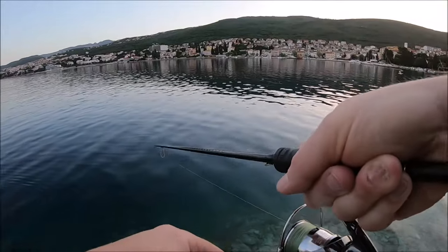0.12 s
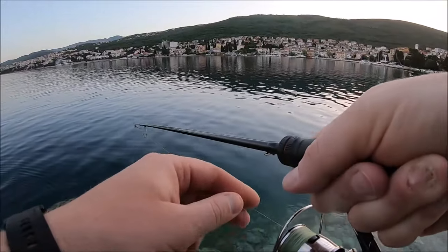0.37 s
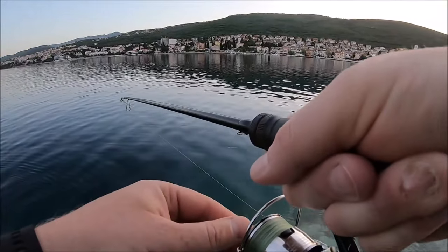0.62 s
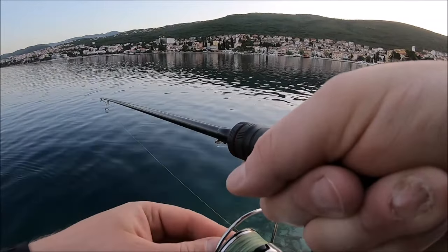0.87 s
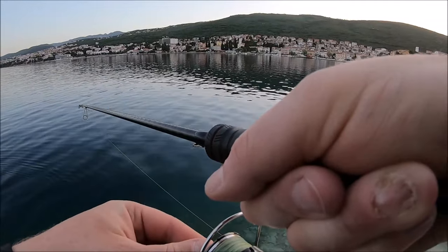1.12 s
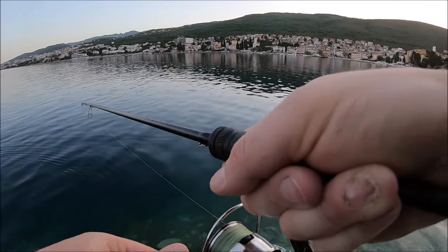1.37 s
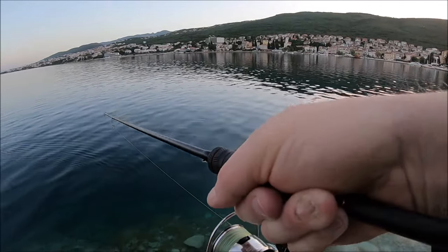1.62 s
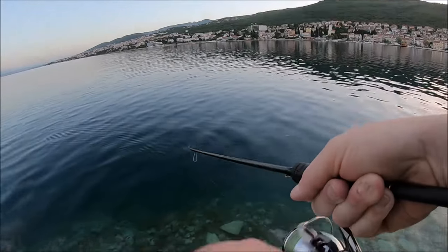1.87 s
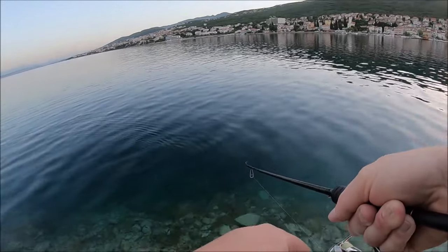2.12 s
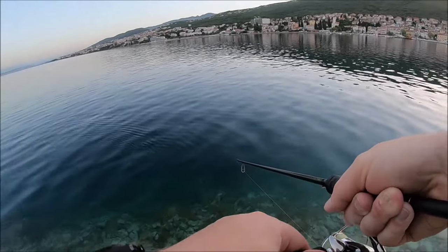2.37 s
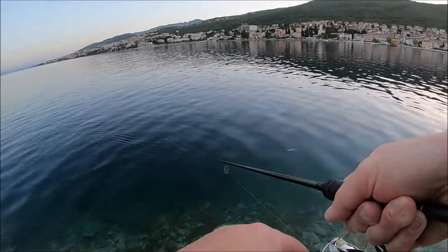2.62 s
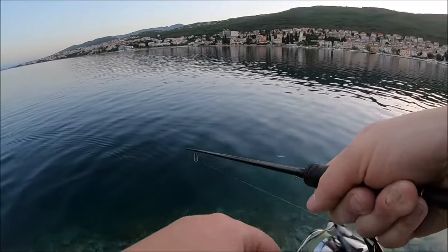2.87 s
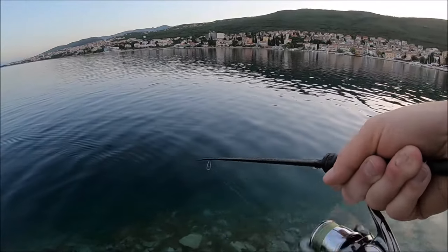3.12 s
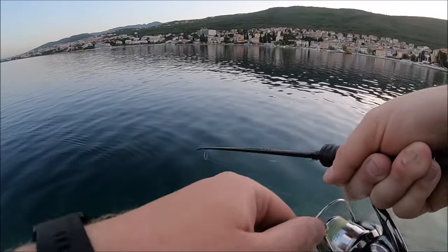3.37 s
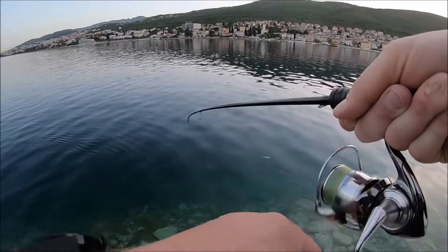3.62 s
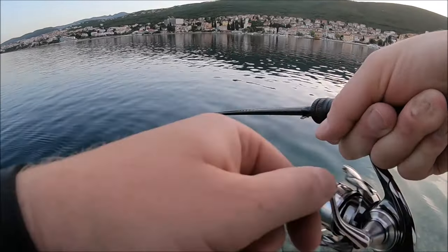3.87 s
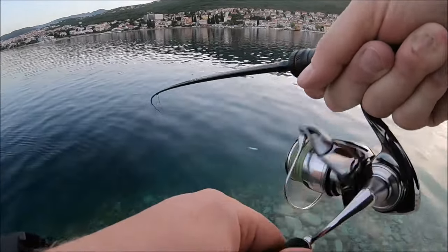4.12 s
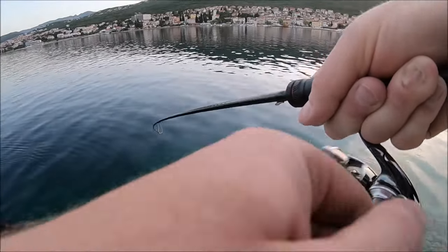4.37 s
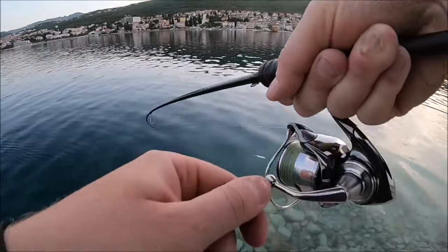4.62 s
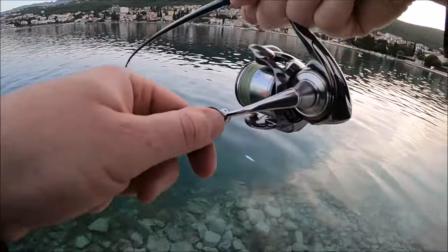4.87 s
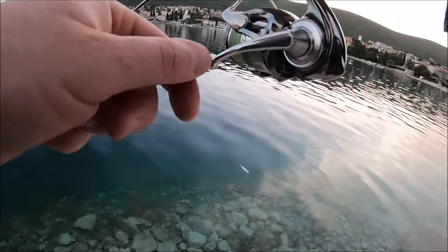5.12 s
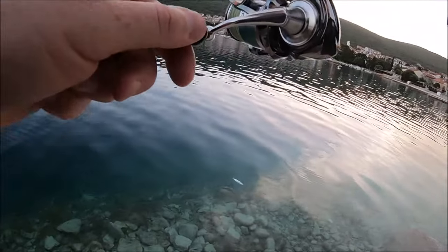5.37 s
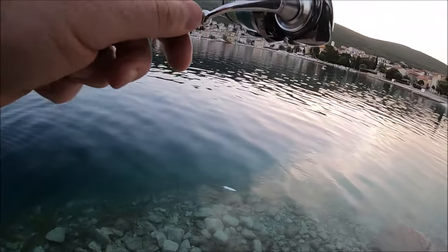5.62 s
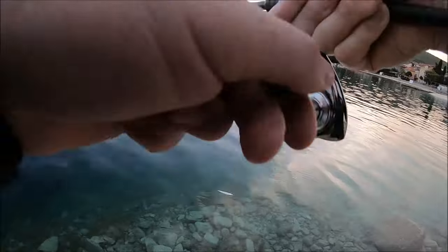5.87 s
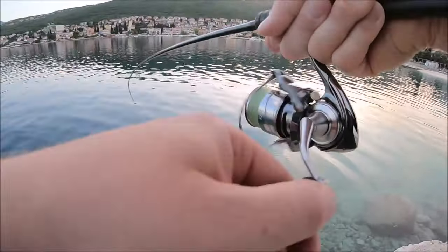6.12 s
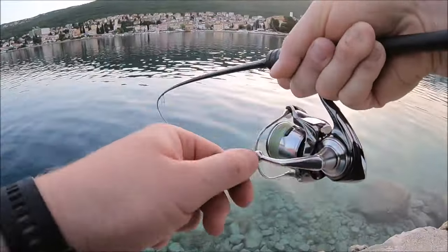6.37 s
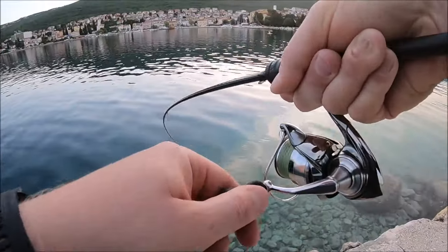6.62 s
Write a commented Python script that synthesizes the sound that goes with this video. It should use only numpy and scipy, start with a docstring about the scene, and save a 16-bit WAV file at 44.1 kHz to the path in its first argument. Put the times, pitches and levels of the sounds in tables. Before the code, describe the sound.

A fishing reel is worked in uneven bursts at a calm shore: thin grainy gear whir, bright dry metallic clicks, and two rapid ratchet buzzes as line slips out. Hands rustle softly between spurts. The longest cranking comes mid-way with steady clicking; the fastest comes late, with heavy thuds against the microphone mount. Everything is close and dry, with light low wind and barely audible distant water behind.

```python
"""A spinning reel is cranked in spurts at a calm shore, close under a chest-worn camera with two sound ports.
A short crank whine with four clicks opens it; after a lull of small ticks, a crank at 1.7 s ends in a buzz
as line runs out and snaps of the drag spring crowd together. From 2.9 s a long spurt whines with crank speed
among spool clicks, which go on to 5 s. From 5.7 s a fast crank comes with the rod butt bumping the chest, then a
last buzz. Filtered noise runs throughout: a hiss and rustle of rubbing, light wind in the ports, far water."""
import sys
import numpy as np
from scipy import signal
from scipy.io import wavfile
from scipy.ndimage import uniform_filter1d

SR = 44100
rng = np.random.default_rng(int(sys.argv[2]) if len(sys.argv) > 2 else 0)


def volts_from_decibels(level):
    """Turn decibel levels (scalar or array-like) into linear amplitude factors."""
    exponent = np.asarray(level, float) / 20
    return 10 ** exponent


def output_pcm(signal):
    """Save a mono or channel-first signal as 16-bit PCM at the path in sys.argv[1].

    Samples are clipped to [-1, 1] before scaling.
    """
    pcm = np.clip(np.atleast_2d(signal).T, -1, 1) * 32767
    wavfile.write(sys.argv[1], SR, np.round(pcm).astype(np.int16))


N = 297234
T = np.arange(N) / SR  # time of every sample in seconds


# Single snaps of the drag spring. Each row: time in seconds, strength in dB before the spool colours it.
SINGLE_SNAPS = [(0.031, -20.5), (0.0592, -21.5), (0.0864, -18.5), (0.1333, -22), (1.9308, -27),
                (1.9592, -28), (1.976, -24.5), (2.011, -34.5), (2.0245, -23), (2.0352, -23.5),
                (2.5657, -36.5), (2.582, -24.5), (2.5885, -33.5), (2.598, -22.5), (2.6198, -24.5),
                (2.6293, -31), (2.6435, -28), (2.6589, -27.5), (2.6902, -28.5), (2.9384, -25.5),
                (3.1114, -25.5), (3.2312, -25), (3.2737, -23.5), (3.301, -29.5), (3.3235, -28),
                (3.3488, -21.5), (3.3911, -22), (3.4224, -19.5), (3.454, -20.5), (3.4988, -20.5),
                (3.5538, -21.5), (3.5901, -21.5), (3.6455, -22.5), (3.7445, -25), (3.836, -28.5),
                (3.877, -29.5), (3.9334, -23.5), (3.9664, -19.5), (4.0099, -23), (4.048, -24),
                (4.0753, -22), (4.101, -24.5), (4.1307, -23), (4.1524, -27.5), (4.171, -20.5),
                (4.1966, -23), (4.2218, -28), (4.2405, -27.5), (4.2639, -24.5), (4.2853, -26),
                (4.3106, -26), (4.3443, -26), (4.3696, -29), (4.3964, -25), (4.4253, -24), (4.444, -23),
                (4.46, -24.5), (4.482, -24), (4.5099, -21), (4.528, -24), (4.5432, -22.5), (4.558, -24.5),
                (4.5741, -23), (4.588, -21.5), (4.6025, -23), (4.6176, -24), (4.6383, -21.5), (4.659, -22),
                (4.6946, -19.5), (4.706, -36.5), (4.727, -21), (4.7631, -21.5), (4.804, -22),
                (4.8407, -21.5), (4.8676, -22), (4.8865, -35.5), (4.8997, -21), (4.9372, -19),
                (4.975, -22.5), (5.6656, -26.5), (6.2372, -32.5), (6.2954, -27), (6.3138, -29.5),
                (6.3311, -31), (6.3562, -30.5), (6.3768, -28.5), (6.3932, -23), (6.4079, -25.5),
                (6.4242, -26.5), (6.4426, -27), (6.4643, -28.5), (6.519, -27), (6.5345, -30.5),
                (6.545, -22), (6.5581, -28.5), (6.573, -23.5), (6.5915, -27)]
# Fast runs of snaps while line pays out, one list a run.
# Each row: time in seconds, average snaps per second, strength in dB before the spool colours it.
LINE_RUNS = [
    [(2.042, 185, -24), (2.1, 150, -29.5), (2.15, 235, -28.5), (2.29, 195, -26), (2.35, 142, -25.5),
     (2.44, 230, -26), (2.51, 270, -29), (2.56, 120, -22)],
    [(6.6, 180, -23), (6.63, 225, -25.5), (6.71, 270, -24.5), (6.74, 350, -31)],
]
# Ringing modes of spool and spring. Each row: pitch in Hz, relative level in dB,
# time to die by 60 dB in seconds, left over right in dB, how far the left leads in radians.
SPOOL_MODES = [(3840, -21.5, 0.021, -6.5, 1), (4510, -23.5, 0.032, -5, -2.5), (5050, -11, 0.025, 2, -2),
               (5846, -12.5, 0.012, -16.5, -1), (6220, -29.5, 0.15, 14, -6.5), (6990, 4.5, 0.0067, -5, 1),
               (7404, -5, 0.016, -0.5, 2.74), (8070, -10.5, 0.022, -2, 0.78), (8720, -6.5, 0.018, 2, -9),
               (9370, -14, 0.02, 12, -7), (10040, -12.5, 0.013, -8.5, -2.5), (10760, -7.5, 0.0097, -3, -6),
               (11380, -13, 0.019, 3, 2.5), (12430, -18, .011, -1.5, 1.5), (13660, -12.5, 0.011, -1.5, 2),
               (14800, -22.5, 0.011, -5, -0.5)]
# Each spool mode beams its own way. Each entry: dB that mode gains with the reel fully side-on.
SIDE_ON_GAIN = [-6, -30, -9.5, -6.5, -3, 0, 3, 3.5, 8.5, -13, -4.5, -25.5, -7, -1.5, -10, 13]
# How the reel is held. Each row: time in seconds, how far side-on from 0 to 1, extra left over right in dB
# near 7 kHz, dB added to modes over 9.5 kHz as the spool tips to the ports.
REEL_FACING = [(0, 0.13, 8, 1.5), (1.9, 0.3, 3.5, 4.5), (2.7, 0.66, 5, 1), (3.2, 0.28, -1, 5),
               (3.7, 0.15, -10, -0.5), (4.3, 0.08, 6, 4.5), (5, 0, -5.5, 3), (5.7, 0.34, -6, 2.5),
               (6.3, 0, 5, 9), (6.74, 0, -4.5, 6)]


def drag():
    """Each snap chatters for a few ms and rings the spool; every mode is struck a little differently."""
    snaps = np.zeros(N)
    for s, db in SINGLE_SNAPS:
        snaps[round(s * SR)] = volts_from_decibels(db)

    rate, level = np.zeros((2, N))
    for rows in LINE_RUNS:
        on = (T >= rows[0][0]) & (T < rows[-1][0])
        per_s, db = curves(rows)
        rate += on * per_s
        level += on * volts_from_decibels(db)
    uneven_rate = rate * (1 + 0.18 * slow(60).real)
    teeth = np.floor(np.cumsum(uneven_rate) / SR)  # a snap falls at each whole number
    run_level = level * volts_from_decibels(0.74 * rng.standard_normal(N))
    snaps[1:] += (np.diff(teeth) > 0) * run_level[1:]

    u = np.arange(700) / SR
    main_push = (u / 0.0014) ** 2 * np.exp(2 - 2 * u / 0.0014)
    chatter = main_push + 0.079 * (u > 0.002) * np.exp(-u / 0.0041)
    force = signal.oaconvolve(snaps, chatter)[:N]
    tooth = np.cumsum(snaps > 0)

    side_on, main_pan_db, bright_db = curves(REEL_FACING)
    high_pan_db = 3.5 - 4.0 * side_on  # upper modes lean left until the reel turns side-on
    out = np.zeros((2, N))
    for (hz, db, t60, pan_db, lead), side_db in zip(SPOOL_MODES, SIDE_ON_GAIN):
        long_ring = t60 > 0.05
        direct_noise, scattered_noise = rng.standard_normal((2, N))
        phase, grip, off = rng.standard_normal((999, 3))[tooth].T  # one draw a tooth
        pitch = hz * (1 + 0.03 * off)
        push = 0.19 * volts_from_decibels(0.5 * grip) * np.exp(2j * np.pi * (pitch * T + phase))
        # teeth grip unevenly; only some set off the long rings
        luck = volts_from_decibels(-9 * abs(off) * long_ring + 2 * grip)
        direct = ring(force * (push + direct_noise) * luck, hz, t60)
        scattered = ring(force * scattered_noise * luck, hz, t60)  # reaches the left port off the hand
        if hz > 7500:
            pan_db = pan_db + high_pan_db
        else:
            pan_db = pan_db + main_pan_db * (hz > 6500)
        both = pair(direct, pan_db, lead)
        both[0] = 0.71 * both[0] + 1.33 * volts_from_decibels(pan_db / 2) * scattered.imag
        both *= volts_from_decibels(3 * slow(15).real)  # the turning spool sweeps each mode past the ports
        mode_db = db + (hz > 9500) * bright_db + long_ring * 3.5 + side_on * side_db
        out += volts_from_decibels(mode_db) * both
    # so small a spool radiates little under its lowest modes
    band = signal.butter(3, [2900, 15900], "bandpass", fs=SR, output="sos")
    return volts_from_decibels(-26.5) * signal.sosfilt(band, out)


# Spurts of cranking, one list a spurt. Each row: time in seconds, gear tooth rate in Hz, load in dB.
CRANK_SPURTS = [
    [(0, 2146, 2), (.03, 2513, 0), (.09, 1376, 1.5), (.15, 1194, -6.5)],
    [(1.71, 1386, -9.5), (1.8, 3160, 2), (1.86, 3590, -0.5), (1.88, 3926, 0), (1.92, 2213, 0.5),
     (2.0, 1720, -5), (2.08, 1395, -18), (2.14, 2284, 4), (2.2, 2020, -3)],
    [(2.87, 1410, -21), (2.9, 1910, -0.5), (2.95, 1920, 0), (2.995, 2200, -1), (3.05, 1427, -5),
     (3.09, 1628, -1.5), (3.15, 2600, -4), (3.21, 2567, 1.5), (3.27, 1503, -6.5), (3.32, 1996, 3),
     (3.36, 1550, -7.5), (3.4, 1886, 0.5), (3.48, 1730, -3), (3.54, 1174, -2), (3.61, 1259, 2),
     (3.64, 1900, -1), (3.68, 2392, 3.5), (3.81, 1904, 1.5), (3.86, 2580, 6), (3.9, 1722, 3.5),
     (3.97, 1690, 3.5), (4.0, 1189, 2.5), (4.15, 970, -3.5), (4.25, 1535, 7.5), (4.31, 1414, 1.5),
     (4.35, 2123, 5), (4.43, 1997, 4.5), (4.48, 1313, 0.5), (4.6, 947, -5.5)],
    [(5.71, 1152, -8.5), (5.78, 2500, 9.5), (5.83, 3310, 2), (5.86, 3143, 5), (5.89, 3820, 4.5),
     (5.94, 4330, 9), (5.97, 3584, 0), (5.995, 4790, 13.5), (6.03, 2517, 4.5), (6.06, 1960, 4.5),
     (6.1, 2560, 4.5), (6.13, 2650, 6), (6.16, 3200, 3.5), (6.22, 3376, 1.5), (6.26, 2610, 7),
     (6.29, 3083, 5.5), (6.34, 1950, -0.5), (6.4, 1885, -11)],
]
# Tooth tone, octave and twelfth. Each row: dB at a 2 kHz tooth rate before the case colours it,
# dB gained per octave of speed, share of the load felt.
TOOTH_PARTIALS = [(-52., -0.4, 1.04), (-53.5, 4.5, 1.67), (-55, 1, 0.68)]


def gears():
    """A fuzzy, broken tooth tone with overtones follows crank speed and swells where it crosses a case resonance."""
    out = np.zeros((2, N))
    fuzz = []
    for width in (110, 200, 320):  # Hz, one for each partial
        blur = evened(slow(width) + 0.8 * slow(4 * width))
        fuzz.append(blur * volts_from_decibels(6 * slow(25).real - 3))
    waver = 1 + 0.022 * slow(45).real
    for on, hz, load_db in spurts(CRANK_SPURTS, 0.012):
        turn = np.exp(2j * np.pi * np.cumsum(hz * waver) / SR)
        for k, (db, slope_db, share) in enumerate(TOOTH_PARTIALS):
            f = hz * (k + 1)
            case = housing(f) / (1 + (f / 6500) ** 4)  # grease damps the highest overtones
            gain = on * volts_from_decibels(db + slope_db * np.log2(hz / 2000) + share * load_db) * case
            out += gain * pair(fuzz[k] * turn ** (k + 1), read(LEAN, f) - 2.5, read(LEAD, f))
    return out


# Resonances of the gear case. Each row: centre in Hz, width in Hz, gain at the centre in dB.
CASE_RESONANCES = [(1950, 200, 6.5), (2500, 200, 1), (2990, 450, -8.5), (3533, 200, 7.5), (3850, 650, 8),
                   (4650, 170, 3), (5350, 450, 7)]


def housing(hz):
    """Gain of the gear case: each resonance lifts or dips the sound around its centre."""
    gain = 1
    for f, width, db in CASE_RESONANCES:
        gain = gain + (volts_from_decibels(db) - 1) / (1 + (2 * (hz - f) / width) ** 2)
    return gain


def rubbing(crank_db, slope_db, share, run_db, idle_db):
    """How hard one layer rubs: with the crank's speed and load, and with line running off the spool."""
    fade_s = 0.039
    crank, line = np.zeros((2, N))
    for on, hz, load_db in spurts(CRANK_SPURTS, fade_s):
        crank += on * volts_from_decibels(crank_db + slope_db * np.log2(hz / 2000) + share * load_db)
    for on, per_s, db in spurts(LINE_RUNS, fade_s):
        line += on * volts_from_decibels(run_db + db) * per_s / 200
    return crank + line + volts_from_decibels(idle_db)


# Colour of the hiss before the gear case shapes it. Each row: frequency in Hz, relative dB per Hz.
HISS_COLOUR = [(2000, -44.5), (3000, -13), (4000, -5.5), (5200, -8), (6500, -2.5), (10500, -9.5),
               (14000, -29.5), (16000, -45.5)]
# Colour of the duller rustle. Each row: frequency in Hz, relative dB per Hz.
DULL_COLOUR = [(350, -37), (600, -11.5), (1000, -2.5), (1400, 1.1), (2000, -6), (2700, -1), (3300, -14.5),
               (5000, -35.5)]
# Hands and sleeve brushing the tackle. Each row: centre in seconds, half length in seconds,
# rustle level in dB before the grit, dB by which the hiss stands over it.
HAND_BRUSHES = [(.2, 0.16, -73, -7.5), (0.485, 0.045, -74, -2.5), (1.442, 0.051, -69.5, -4),
                (1.56, 0.14, -61, -16), (2.611, 0.075, -51.5, -0.5), (2.795, 0.068, -64.5, -23),
                (3.066, 0.052, -52, -8), (4.34, 0.19, -65, 8.5), (4.743, 0.22, -62.5, -15),
                (4.9, 0.024, -61, 4), (5.018, 0.088, -65, -19.5), (5.639, 0.12, -67, -7.5),
                (6.362, 0.029, -64.5, 19), (6.517, 0.17, -61, -0.5)]


def rub():
    """Grainy hiss of bearings and line, coloured by the gear case, over a duller rustle."""
    swells = [(s, half, db, db + bright_db) for s, half, db, bright_db in HAND_BRUSHES]
    dull, bright = bells(swells)
    grit = volts_from_decibels(2.07 * slow(200).real)
    hz = np.arange(1500, 16500, 50)
    colour = np.transpose([hz, read(HISS_COLOUR, hz) + 20 * np.log10(housing(hz))])
    # run_db: level over the strength of the snaps, at 200 snaps per second
    hiss_level = bright + rubbing(crank_db=-54.5, slope_db=1.5, share=0.8, run_db=-23, idle_db=-86)
    rustle_level = dull + rubbing(crank_db=-60, slope_db=2.2, share=-0.07, run_db=-24.5, idle_db=-81)
    hiss = hiss_level * noise(colour, size=512, patchy_db=5.5, likeness=0.81)
    rustle = rustle_level * noise(DULL_COLOUR, size=512, patchy_db=4.0, likeness=1.19)
    return grit * (hiss + rustle)


# Blows on the camera. Each row: time in seconds, then how hard each part is struck in dB:
# slow sway, chest, shell, knock.
BUTT_BUMPS = [(1.652, -53, -74, -33, -63), (1.803, -41, -44.5, -60, -48), (3.121, -47, -45.5, -45.5, -52),
              (3.988, -42, -30, -31.5, -29.5), (4.996, -42, -36.5, -26, -16),
              (5.9431, -21, -21.5, -22, -16.5), (5.996, -20, -22.5, -27.5, -21),
              (6.126, -37, -23, -32, -25), (6.196, -45.5, -39, -47, -44), (6.349, -54, -47, -43.5, -42),
              (6.658, -49, -39.5, -53, -38)]
# Modes of camera mount and chest, lowest first. Each row: pitch in Hz, time to die by 60 dB in seconds,
# lag behind the blow in seconds, left over right in dB, how far the left leads in radians.
MOUNT_MODES = [(62.6, 0.098, 0.0039, -5.5, 0.23), (104, 0.12, 0.0045, -12, 1.7),
               (261.8, 0.092, .003, -14, 8.3), (726.5, 0.05, 0.00074, -3, 2.6),
               (1200, 0.019, 0.00046, 19, 3.493)]


def bumps():
    """Blows on the mount: a crack and the upper modes answer at once, the chest follows late and swells."""
    out = np.zeros((2, N))
    for k, (hz, t60, lag, pan_db, lead) in enumerate(MOUNT_MODES):
        blows = np.zeros(N)
        for s, *db in BUTT_BUMPS:
            top_db = 1.72 * db[-1] + 11.5  # a harder knock is brighter
            strengths = (*db, top_db)
            blows[round((s + lag) * SR)] = -volts_from_decibels(strengths[k])
        swell = ring(ring(blows, hz, t60), hz, 2.21 / hz)
        swell *= np.log(1000) * hz / 3.18 / SR  # takes back the gain of ringing twice
        out += pair(swell, pan_db, lead) / volts_from_decibels(pan_db / 2)  # strengths hold at the left port
    # the blows of the top mode also drive a short knock and a crack
    knock = volts_from_decibels(17.5) * ring(ring(blows, 960, 0.0077), 910, 0.0011) * 0.058
    crack = volts_from_decibels(-11) * ring(ring(blows, 2600, 0.016), 2100, 0.003) * 0.085
    return out + pair(knock + crack, -2.1, 2.53)


# Small ticks of line and grip. Each row: start in seconds, peak in dB midway between the ports, centre in Hz.
SMALL_TICKS = [(0.489, -51.5, 1810), (1.1012, -47.5, 6410), (1.212, -52, 6700), (1.435, -38.5, 3520),
               (1.4842, -27, 1200), (1.581, -53.5, 8000), (1.617, -54, 8400), (1.652, -55.5, 7000),
               (5.3298, -54.5, 6000)]


def ticks():
    """Short puffs of noise, each ringing a broad resonance."""
    out = np.zeros((2, N))
    u = np.arange(900) / SR
    puffs = rng.standard_normal((len(SMALL_TICKS), len(u)))
    for (s, db, hz), puff in zip(SMALL_TICKS, puffs):
        z = ring(puff * np.exp(-u / 0.003), hz, 0.0014)
        at = round(s * SR)
        out[:, at:at + len(u)] += volts_from_decibels(db) * pair(z / abs(z).max(), -5, read(LEAD, hz))
    return out


# Puffs of wind in the ports. Each row: centre in seconds, half length in seconds,
# relative gust level in dB, relative level of the lowest rumble in dB.
WIND_PUFFS = [(.02, 0.05, -73, -72), (1.63, 0.22, -60, -64), (1.9, 0.083, -66, -65.5),
              (2.95, 0.38, -67.5, -78), (4.17, 0.0887, -63.5, -82), (4.85, 0.28, -61.5, -66),
              (5.3, 0.22, -71.5, -72), (5.92, 0.052, -52, -59), (6.03, 0.0282, -45, -60),
              (6.2, 0.15, -57, -46), (6.74, 0.088, -50.5, -70)]
# Wind colour in the ports. Each row: frequency in Hz, relative dB per Hz.
PORT_COLOUR = [(18, -58.5), (30, -40.5), (64, -9.5), (81, -17), (118, -20.5), (161, 0.5), (231, -5.5),
               (286, -5.5), (346, -25), (402, -23), (600, -22), (780, -28.5), (1320, -120)]


def wind():
    """Lumpy low noise, nearly unrelated at the two ports, over a deep rumble."""
    gust, rumble = bells(WIND_PUFFS)
    lumps = volts_from_decibels(3.1 * slow(27.5).real)
    gust_level = (gust + volts_from_decibels(-58.5)) * volts_from_decibels(3.5)  # puffs over a steady breeze
    gusts = gust_level * lumps * noise(PORT_COLOUR, size=2048, patchy_db=0.0, likeness=0.22)
    deep = [(12, -20.5), (30, -1.5), (60, -10.5), (90, -33.5), (200, -67)]  # Hz, relative dB per Hz
    sides = volts_from_decibels([[-3], [1.5]])  # left, right
    rumble_level = (rumble + volts_from_decibels(-81.5)) * sides
    return gusts + rumble_level * noise(deep, size=4096, patchy_db=0.0, likeness=2.5)


# Far water and air. Each row: frequency in Hz, relative dB per Hz.
SHORE_COLOUR = [(180, -49), (300, -8.5), (400, -9), (520, -14), (810, -7.5), (1000, -17), (1300, -21.5),
                (3000, -37.5), (5600, -42), (8000, -40.5), (16000, -56)]


def shore():
    """Far water and air: a steady bed of faintly patchy noise."""
    return volts_from_decibels(-60) * noise(SHORE_COLOUR, size=1024, patchy_db=3.0)


# How broad sounds differ between the ports.
# Each row: frequency in Hz, likeness of left and right (scaled, then held within -1 to 1).
SAME_SIDES = [(300, 0.03), (500, 1), (1200, 1.07), (2000, -0.43), (4000, 1), (8000, -0.5), (16000, 8.5)]
# Each row: frequency in Hz, how far the left leads in radians.
LEAD = [(300, 3), (1500, 4.5), (3000, 1), (4500, 1.42), (6000, 2), (16000, -0.5)]
# Each row: frequency in Hz, left over right in dB.
LEAN = [(100, -5.5), (1000, -1), (3500, -6), (6000, -3), (8500, 7), (16000, 1.5)]


def noise(colour, size, patchy_db, likeness=1):
    """Stereo noise of rms 1 from random short-time spectra with drifting patches."""
    hop = size // 4
    frames = N // hop + 5
    hz = np.fft.rfftfreq(size, 1 / SR)
    a, b, c, d, patch = rng.standard_normal((frames, len(hz), 5)).T
    patch = uniform_filter1d(patch, size=8, axis=0)  # smooth along frequency
    patch = evened(uniform_filter1d(patch, size=10, axis=1))  # smooth along time
    same = np.clip(likeness * read(SAME_SIDES, hz), -1, 1)[:, None]
    lean = volts_from_decibels(read(LEAN, hz) / 2)[:, None]
    right = a + 1j * b
    left = same * right + np.sqrt(1 - same ** 2) * (c + 1j * d)
    left = left * np.exp(1j * read(LEAD, hz))[:, None]
    z = np.array([left * lean, right / lean])
    z = z * volts_from_decibels(read(colour, hz)[:, None] + patchy_db * patch)
    return evened(signal.istft(z, nperseg=size, noverlap=size - hop)[1][:, :N])


def evened(x):
    """Scales to rms 1."""
    return x / np.sqrt(np.mean(abs(x) ** 2) + 1e-20)


def read(points, hz):
    """Reads a curve over frequency on a log axis."""
    f, value = np.transpose(points)
    return np.interp(np.log(hz + 1), np.log(f + 1), value)


def curves(rows):
    """Every column of a table after the time, drawn out to every sample."""
    s, *columns = np.transpose(rows)
    return [np.interp(T, s, c) for c in columns]


def bells(rows):
    """Sums bell-shaped swells; one gain curve for each dB column."""
    s, half, *columns = np.transpose(rows)
    coarse = T[::64]
    shape = np.exp(-((coarse[:, None] - s) / half) ** 2)
    return [np.interp(T, coarse, shape @ volts_from_decibels(db)) for db in columns]


def spurts(tables, fade_s):
    """For each table: a gate that opens just ahead of it and fades after it, then its columns."""
    for rows in tables:
        since_opening = T - rows[0][0] + 0.026
        until_closing = rows[-1][0] + fade_s - T
        gate = np.clip(np.minimum(since_opening, until_closing) / fade_s, 0, 1)
        yield (gate, *curves(rows))


def ring(x, hz, t60):
    """A dying mode as a complex signal; a unit tap peaks at 1."""
    pole = np.exp((2j * np.pi * hz - np.log(1000) / t60) / SR)
    return signal.lfilter([1], [1, -pole], x)


def pair(z, pan_db, lead):
    """Left and right port for a complex signal: a level difference and a phase lead of the left."""
    left = volts_from_decibels(pan_db / 2) * (z * np.exp(1j * lead)).imag
    right = volts_from_decibels(-pan_db / 2) * z.imag
    return np.array([left, right])


def slow(hz):
    """Smooth complex random wander of rms 1; a larger bandwidth in Hz wanders faster."""
    z = rng.standard_normal(N) + 1j * rng.standard_normal(N)
    r = np.exp(-np.pi * hz / SR)
    return evened(signal.lfilter([1], np.convolve([1, -r], [1, -r]), z))


def scene():
    """All sources added up at the two ports."""
    return drag() + gears() + rub() + bumps() + ticks() + wind() + shore()


def band_limit(x):
    """A steep low-pass at the top of the band."""
    return signal.sosfilt(signal.butter(12, 16800, fs=SR, output="sos"), x)


def record(dry):
    """Turns the finished mix into the final sound."""
    return band_limit(dry)


dry = scene()
out = record(dry)
output_pcm(out)
```